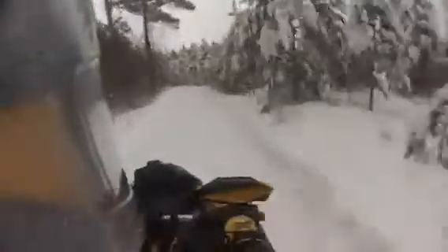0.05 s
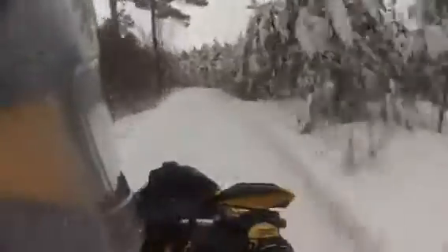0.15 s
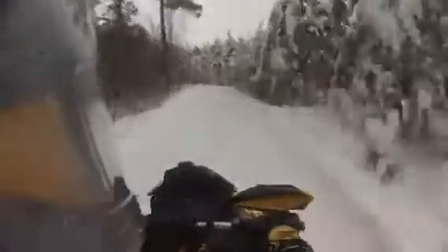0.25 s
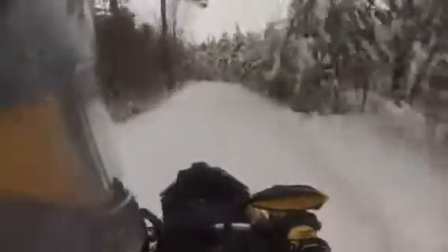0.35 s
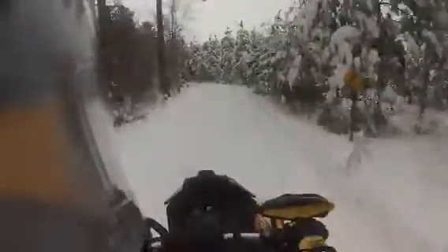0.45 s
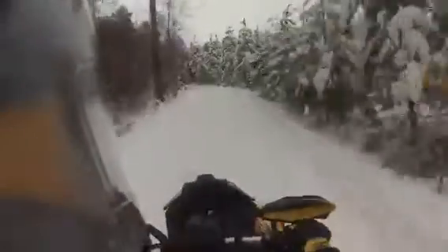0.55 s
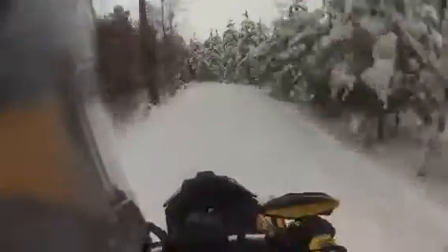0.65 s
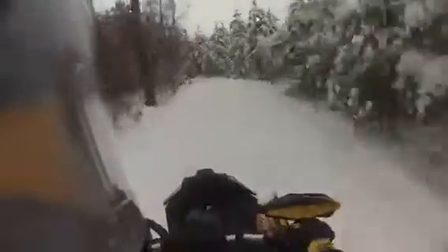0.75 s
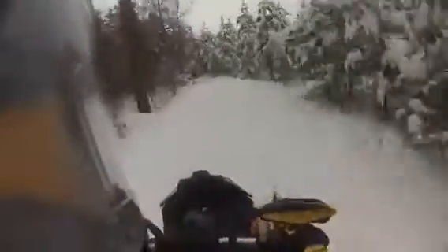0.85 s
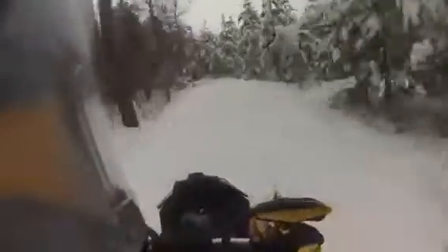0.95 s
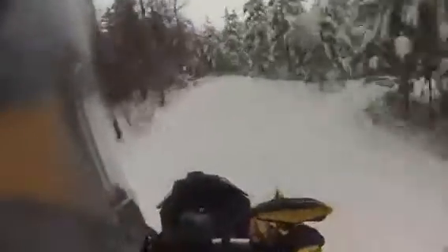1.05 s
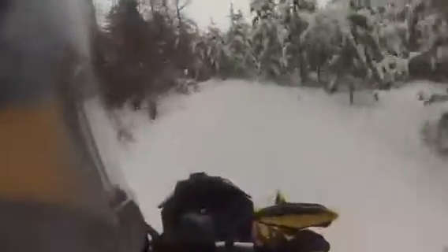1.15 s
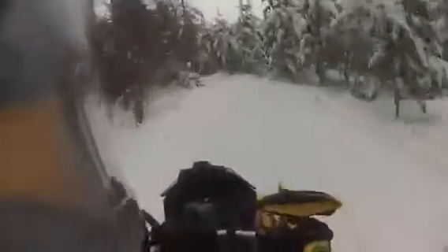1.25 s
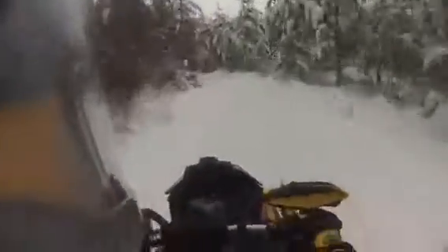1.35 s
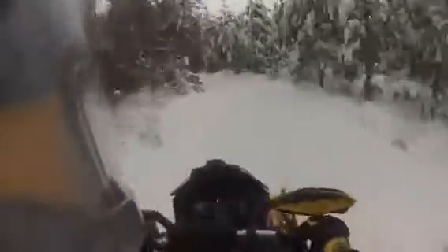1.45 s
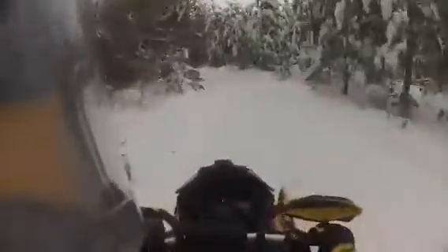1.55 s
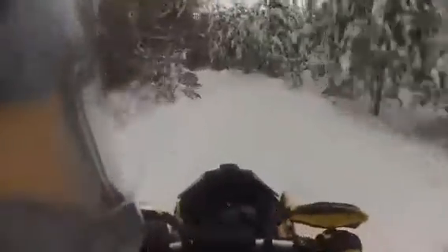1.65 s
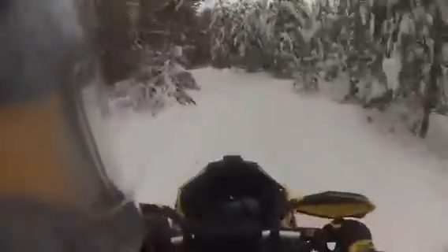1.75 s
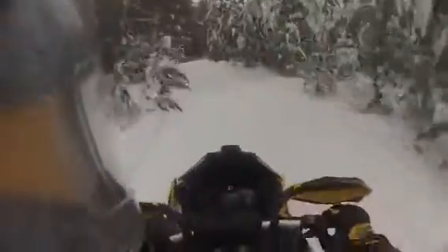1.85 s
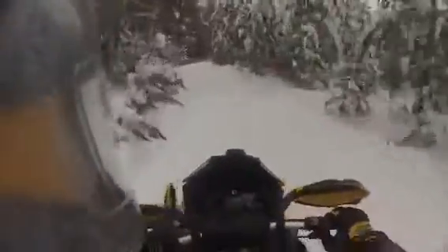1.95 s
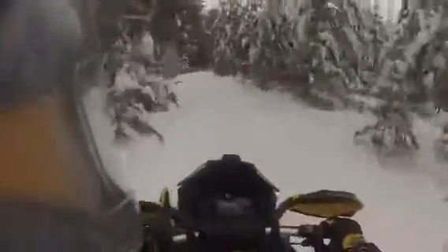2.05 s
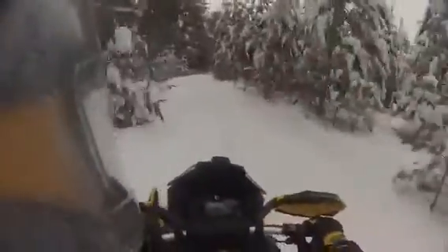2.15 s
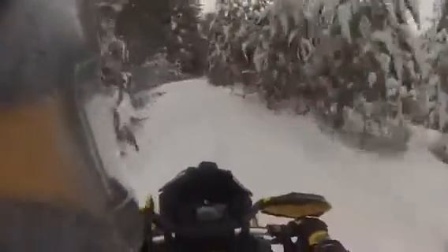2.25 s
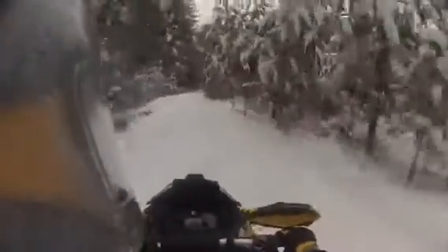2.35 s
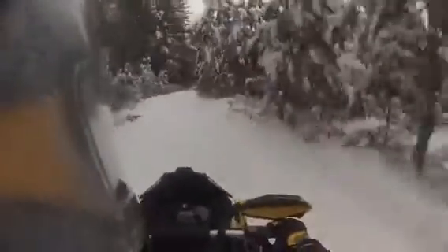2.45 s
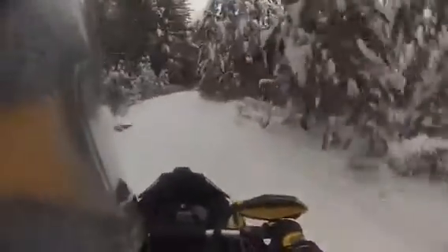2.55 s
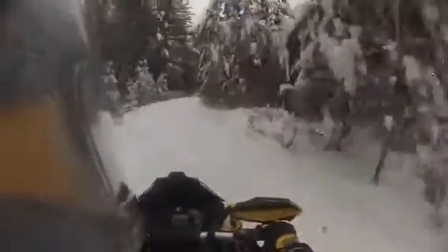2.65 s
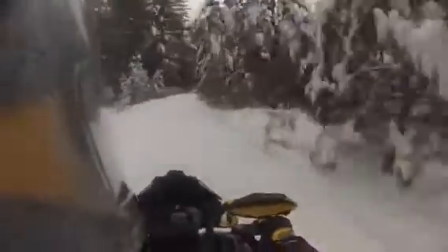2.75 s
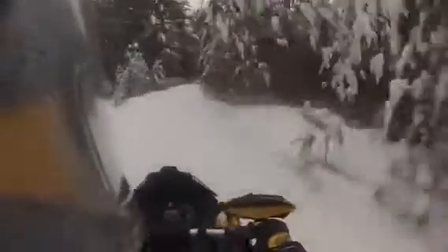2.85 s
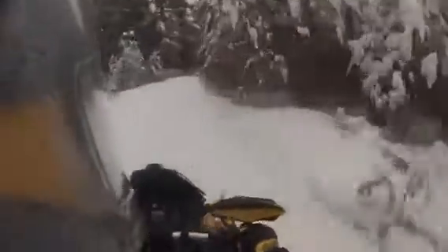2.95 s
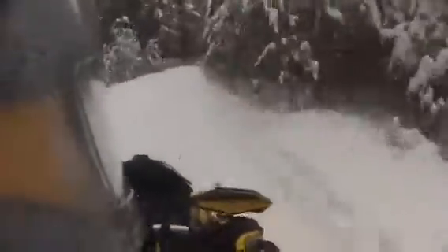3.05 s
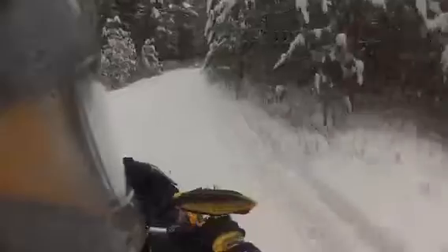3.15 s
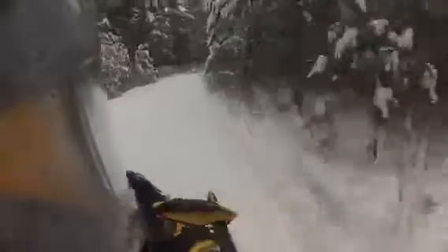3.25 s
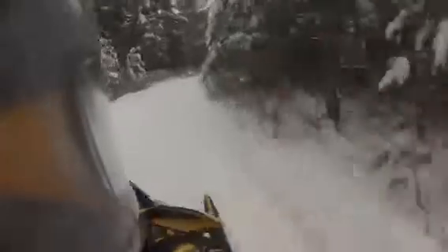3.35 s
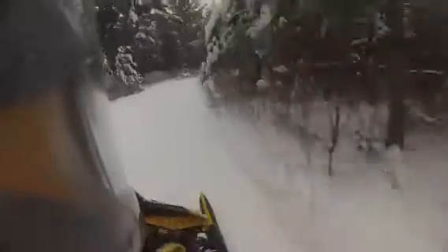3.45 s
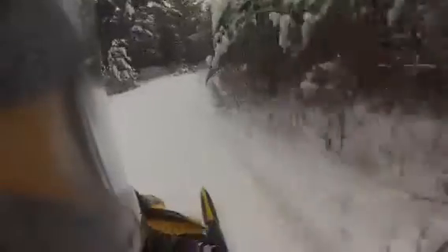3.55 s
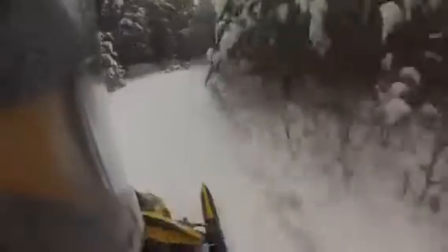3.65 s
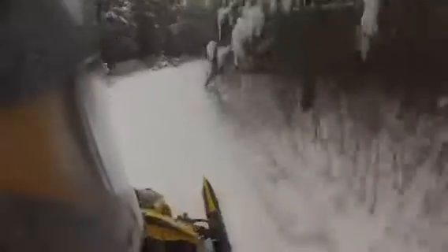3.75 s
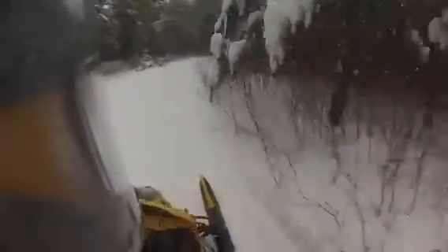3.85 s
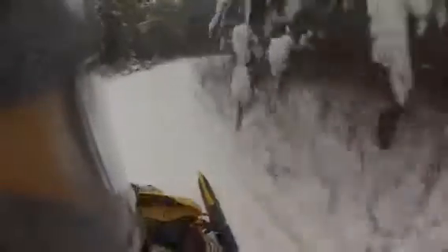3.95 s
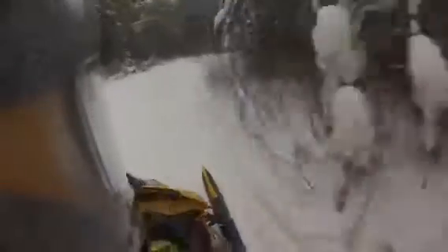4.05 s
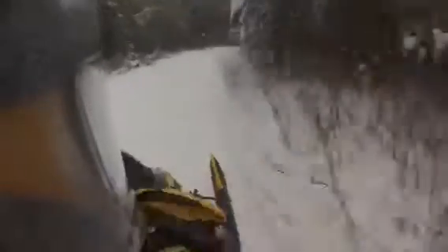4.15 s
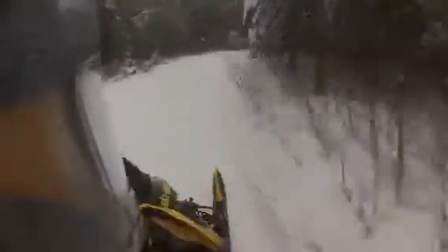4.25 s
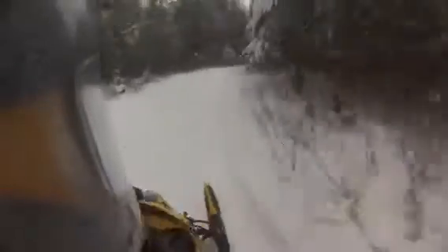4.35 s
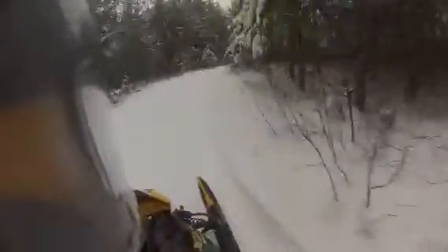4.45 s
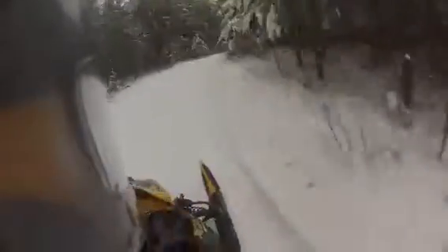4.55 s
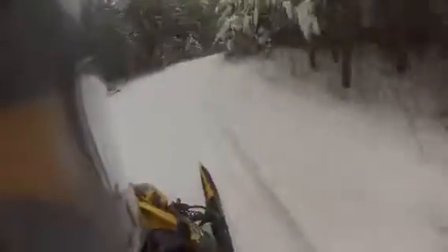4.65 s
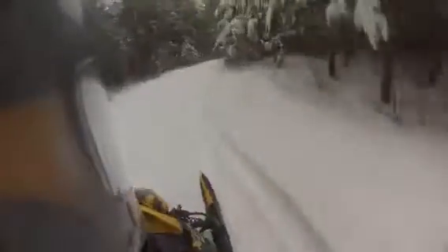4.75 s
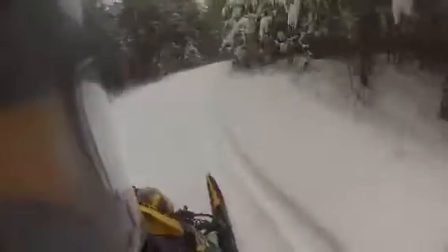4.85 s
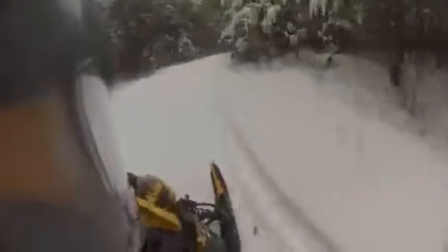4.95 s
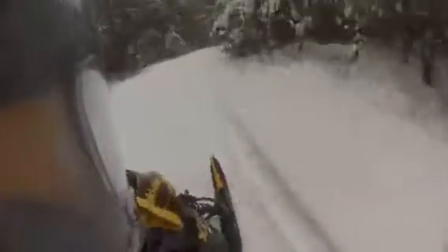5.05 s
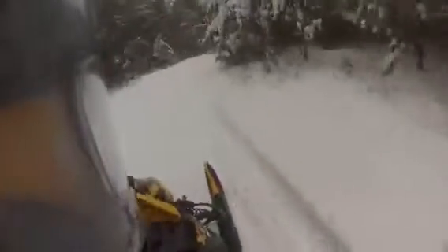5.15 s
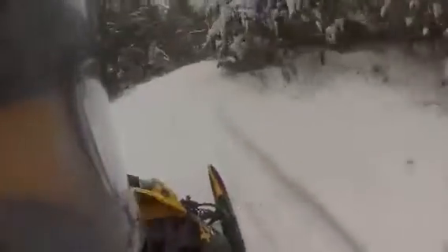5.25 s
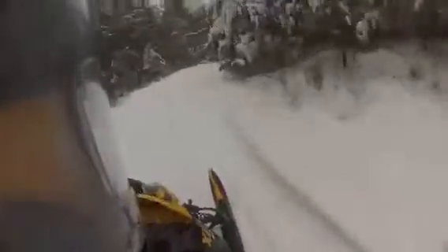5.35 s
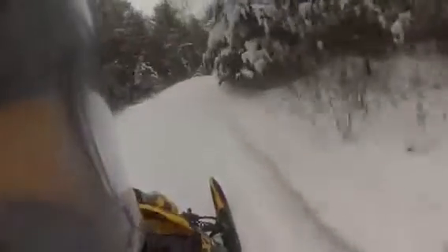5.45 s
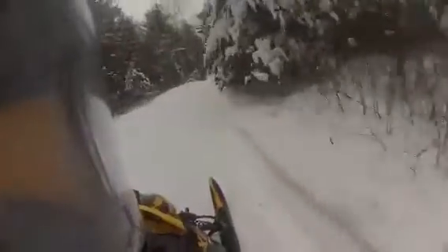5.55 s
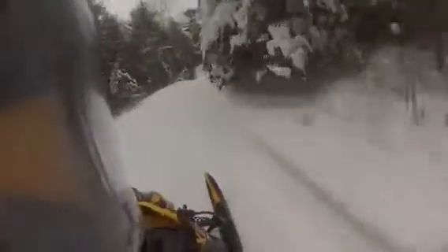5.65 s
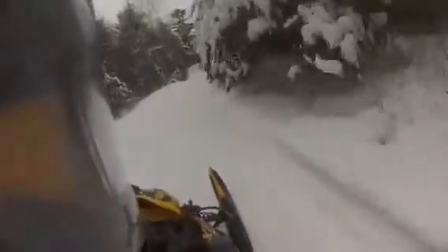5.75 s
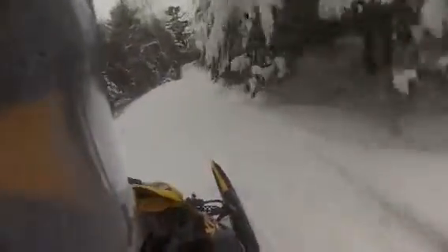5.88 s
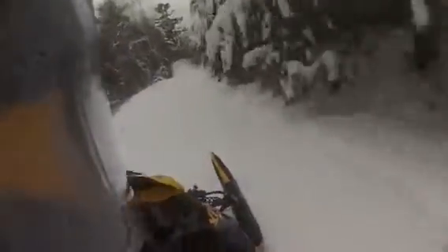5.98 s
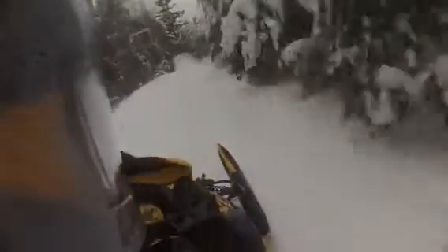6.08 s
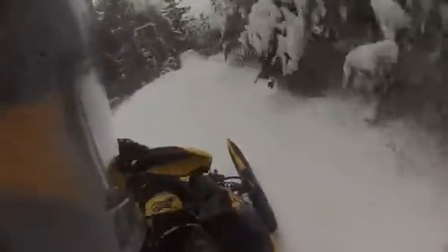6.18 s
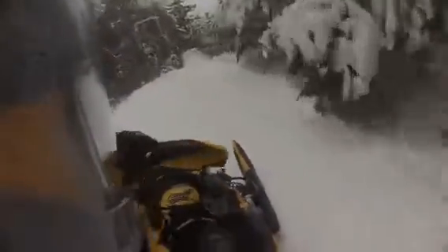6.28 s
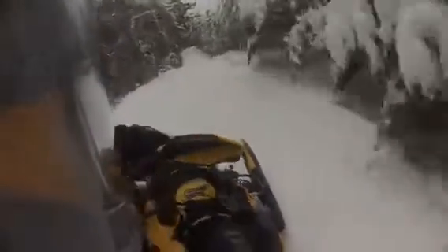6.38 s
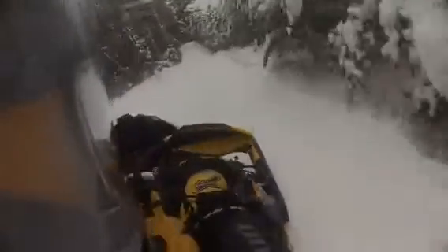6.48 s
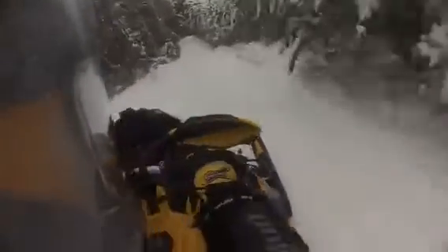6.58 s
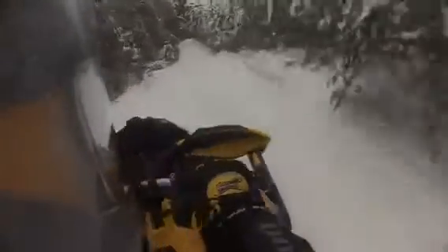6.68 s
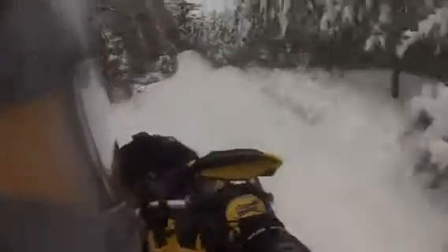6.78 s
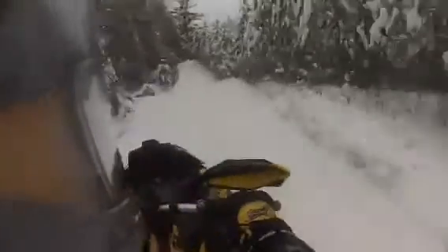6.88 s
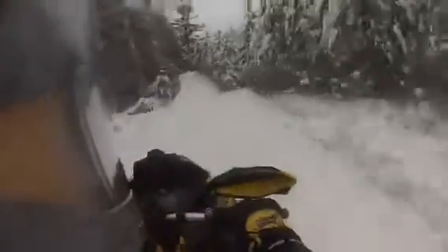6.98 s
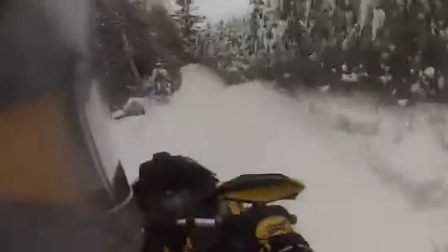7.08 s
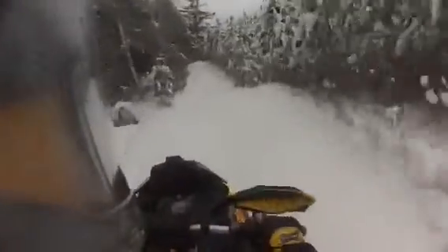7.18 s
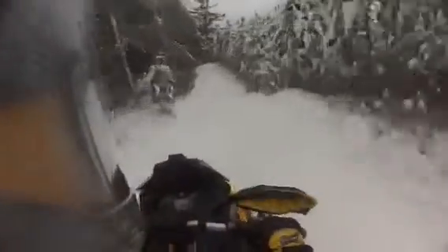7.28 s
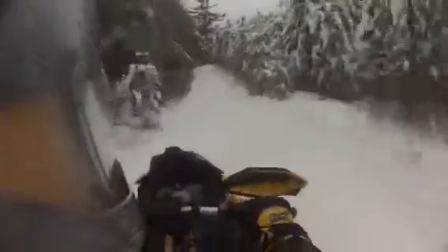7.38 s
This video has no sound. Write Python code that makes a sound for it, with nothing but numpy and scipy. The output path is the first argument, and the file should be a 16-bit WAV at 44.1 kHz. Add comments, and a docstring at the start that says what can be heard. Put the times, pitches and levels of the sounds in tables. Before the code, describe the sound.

Heavy wind buffets a microphone carried by a snowmobile rider on a forest trail. The buzzing engine winds down over the first half, then revs up twice and grows louder as the sled gathers speed. Mechanical clatter, a drumming track and hissing snow run throughout, with a few faint ticks of snow hitting the microphone and a thin wind whistle at the faster moments.

```python
"""A two-stroke twin snowmobile on a forest trail, heard from a camera case on the rider.
It coasts down, then opens up twice and gathers speed. Firings ring the pipe and the block, the drive
clatters under the hood and the track drums. Wind buffets the case and whistles over an edge,
snow hisses past the skis, and a few crumbs tick against the case."""
import sys
import numpy as np
from scipy import signal
from scipy.fft import rfft, irfft, next_fast_len
from scipy.io import wavfile
from scipy.ndimage import uniform_filter1d, minimum_filter1d

SR = 44100
rng = np.random.default_rng(int(sys.argv[2]) if len(sys.argv) > 2 else 0)


def transcribe(u):
    """Save the signal u as a 16-bit wav file named by the first command-line argument.

    u: samples, shape (n,) or (channels, n), limited to [-1, 1]; the rate is SR.
    q: integer samples, one column per channel.
    """
    v = np.clip(np.atleast_2d(u).T, -1, 1)
    q = np.round(v * 32767).astype(np.int16)
    wavfile.write(sys.argv[1], SR, q)


N = 327222
TOP_HZ = 15000

# strength of the firings as the throttle moves: time_s, level_db
FIRING_LEVEL = [(0, -39.5), (.4, -45.5), (1.5, -49), (2.3, -42), (3, -45), (3.8, -45.5), (4.45, -39),
                (5.07, -42), (5.15, -37), (5.5, -35.5), (5.91, -34), (6.03, -31.5), (6.72, -30.5),
                (6.95, -33.5), (7.42, -30)]
# the sled's speed over the snow: time_s, speed_m_s
SLED_SPEED = [(0, 12.87), (.7, 11.6), (1.6, 10.9), (2.4, 10.2), (3, 9.58), (3.65, 8.1), (4.15, 7.2),
              (4.4, 7.67), (5.05, 7.5), (5.5, 7.6), (6, 7.75), (6.7, 11.35), (7.15, 11.5), (7.42, 13.3)]


def engine(turns, bark_db=-3.5, bark_per_db=.3):
    """Pipe and block ring together; the exhaust gains on the block as the throttle opens."""
    load_db = curves(FIRING_LEVEL)[0]
    exhaust_db = bark_db + bark_per_db * (load_db - load_db.mean()) + throttle_snaps()
    voice = bodywork(exhaust(turns) * undb(exhaust_db) + block(turns))
    return unit(voice) * undb(load_db)


def firings(turns, second_db, lag_turns, jitter_s=.000025, scatter_db=1.7):
    """Two pressure pulses a turn; the second cylinder is weaker and may lag, and no two burns are alike."""
    stroke = np.arange(int(2 * turns[-1]))
    second = stroke % 2
    timing, burn = rng.standard_normal((len(stroke), 2)).T
    at = np.interp(stroke / 2 + lag_turns * second, turns, np.arange(N)) + SR * jitter_s * timing
    strength = undb(second_db * second + scatter_db * burn)
    taps = at.astype(int)[:, None] + np.arange(-7, 9)
    offset = taps - at[:, None]
    click = np.sinc(offset) * np.cos(np.pi * offset / 16) ** 2  # lands cleanly between samples
    return np.bincount(np.clip(taps, 0, N - 1).ravel(), (strength[:, None] * click).ravel(), N)


def exhaust(turns, growl_db=1.7):
    """Uneven puffs of gas ring the pipe."""
    # broad tone of the pipe: freq_hz, gain_db
    pipe_tone = [(150, -35), (270, -9), (360, 3), (420, -3), (480, -0.5), (600, -3.5), (700, -4),
                 (800, -5.5), (950, -22), (1120, -4.5), (1450, -17.5), (2000, -56), (8000, -63)]
    # pipe resonances: centre_hz, width_hz, lift_db
    pipe_modes = [(348.4, 25.4, 15.5), (490, 50, 12), (614, 46, 12), (816, 68, 5.5), (1155, 95, 15.5)]
    puffs = firings(turns, second_db=-7, lag_turns=.0022) * undb(growl_db * walk(35))
    return unit(resonate(colour(puffs, pipe_tone), pipe_modes))


def throttle_snaps(attack_s=.041, decay_s=.19):
    """Swing of the exhaust level in dB: the pipe barks as the throttle snaps open, or briefly ducks."""
    # barks and dips, scaled by their envelope: start_s, depth_db
    snaps = [(3.78, 12), (4.28, 3), (5.11, 4), (5.96, -2.5), (6.6, -2)]
    swing_db = 0
    for start_s, depth_db in snaps:
        age = np.maximum(np.arange(N) / SR - start_s, 0)
        swing_db += depth_db * (1 - np.exp(-age / attack_s)) * np.exp(-age / decay_s)
    return swing_db


def block(turns, rasp_db=1.5):
    """Firings knock the block; the nearer cylinder dominates, so every multiple of the crank rate sings."""
    # broad tone of the block: freq_hz, gain_db
    block_tone = [(300, -22.5), (600, -5.5), (900, -1.5), (1050, -4.5), (1170, 2.5), (1400, 1.5),
                  (1520, -2.5), (1700, 3), (2000, 1.5), (2300, -15), (3200, -20), (4800, -21.5),
                  (7200, -20.5), (14000, -83)]
    # block resonances: centre_hz, width_hz, lift_db
    block_modes = [(1184, 72, 9), (1340, 200, 5.5), (1735, 96, 7.5), (1966, 75, 4), (2680, 63, 8.5),
                   (4660, 460, 6)]
    knocks = firings(turns, second_db=-18, lag_turns=0) * undb(rasp_db * walk(70))
    return unit(sway(resonate(colour(knocks, block_tone), block_modes)))


def sway(x, share=.41, path_s=.0034, sway_s=.00014):
    """A second path off the swaying rider makes the overtones swell and fade in turn."""
    i = np.arange(N)
    delay_s = path_s + sway_s * walk(5)
    return x + share * np.interp(i - SR * delay_s, i, x)


def bodywork(x, feedback=-.5):
    """Reflections inside the bodywork smear each pulse into the next without changing its colour."""
    size = next_fast_len(N + SR // 4, True)
    spectrum = rfft(x, size)
    for delay_s in (.0013, .0022, .0037, .0053):
        delay = np.exp(-2j * np.pi * np.arange(len(spectrum)) * SR / size * delay_s)
        spectrum *= (delay - feedback) / (1 - feedback * delay)
    return irfft(spectrum, size)[:N]


def silencer(turns, flutter_db=2):
    """The silencer booms at the firing rate, twice a turn."""
    # weight of the boom: time_s, level_db
    boom_level = [(0, -36), (.7, -27), (3.7, -31.5), (3.9, -25), (4.5, -35), (5.2, -37), (5.9, -31),
                  (6.15, -26.5), (6.5, -24.5), (7.42, -24)]
    boom = np.sin(2 * np.pi * 2 * turns) * undb(flutter_db * walk(32))
    return unit(boom) * undb(curves(boom_level)[0])


def drive(turns, throb=.059, shake_db=.92, strain=.24):
    """Clutch, chain and pistons clatter in step with the crank, louder with speed and a little with load."""
    # tone of the clatter: freq_hz, gain_db
    clatter_tone = [(250, -7.5), (500, -2.5), (750, -9), (1000, 0.5), (1300, -3.5), (1550, -0.5), (1800, 4),
                    (2030, 0), (2280, -10), (2700, -10.5), (3100, -20), (12000, -55.5)]
    # hood and tunnel resonances: centre_hz, width_hz, lift_db
    hood_modes = [(357, 51, 0), (652.4, 11.1, 14), (1236, 13, 4), (1364, 91, 8.5), (1600, 78, 1)]
    pulsing = (1 + throb * np.cos(2 * np.pi * turns)) * undb(shake_db * walk(45))
    clatter = unit(resonate(colour(noise() * pulsing, clatter_tone), hood_modes))
    load_db = curves(FIRING_LEVEL)[0]
    strain_db = strain * (load_db - load_db.mean())
    return clatter * undb(by_speed(cruise_db=-33.5, doubling_db=13.8) + strain_db)


def track(slip=.0133, second_db=-12, third_db=-14):
    """Track lugs drum unevenly as they meet wheel and snow."""
    # lugs passing the drive wheel: time_s, rate_hz, level_db
    lugs = [(0, 160.5, -31.5), (1.3, 141.8, -30.5), (2.3, 121.1, -34), (3.2, 94.84, -31.5),
            (4.1, 81.5, -34), (4.9, 88, -33), (5.2, 119.1, -30), (5.6, 128.6, -32.5), (6, 138.7, -31.5),
            (6.5, 160.4, -42), (7.42, 157.6, -28)]
    rate_hz, level_db = curves(lugs)
    phase = 2 * np.pi * np.cumsum(rate_hz * (1 + slip * walk(12))) / SR
    drum = np.sin(phase) + undb(second_db) * np.sin(2 * phase) + undb(third_db) * np.sin(3 * phase)
    slap = 1 + .6 * walk(22)
    return unit(drum * slap) * undb(level_db)


def wind(swirl_db=1.1, flurry_db=1.2):
    """Big eddies buffet the case and small ones rush round it in quick flurries."""
    # rumble of the big eddies: freq_hz, gain_db
    buffet_tone = [(10, -22.5), (24, 5), (45, -4), (70, -1), (100, -5.5), (150, -10), (200, -15),
                   (300, -24.5), (600, -71)]
    # rush of the small eddies: freq_hz, gain_db
    rush_tone = [(70, -6), (150, 3.5), (230, 1.5), (300, -2), (380, -1.5), (470, -17), (600, -20),
                 (900, -30), (2000, -64)]
    buffet = unit(colour(noise(), buffet_tone))
    buffet *= undb(by_speed(cruise_db=-16.5, doubling_db=13.2) + swirl_db * walk(8))
    rush = unit(colour(noise() * undb(flurry_db * walk(40)), rush_tone))
    return buffet + rush * undb(by_speed(cruise_db=-25.5, doubling_db=19))


def low_swells(width_share=.79):
    """Low swells on the case: wind gusts, and one short thud as the sled hits a bump."""
    # swells of low noise, the second being the thud: peak_s, length_s, level_db, centre_hz
    swells = [(1.203, 0.35, -19.5, 99), (2.217, 0.065, -26.5, 217), (2.89, 0.2, -21, 51.3),
              (3.256, 0.5, -21, 58.6), (4.25, 0.46, -31.5, 102), (4.603, .22, -24.5, 81),
              (4.885, 0.23, -23, 75), (5.096, 0.061, -21, 84.6)]
    source = noise()
    return sum(unit(band(source, hz, width_share * hz)) * undb(level_db) * bump(peak_s, length_s)
               for peak_s, length_s, level_db, hz in swells)


def thumps(push_to_pull_s=.006):
    """The biggest eddies each give the case one push and one pull."""
    # slams on the case: centre_s, strength_db
    slams = [(.372, 3), (.538, 1), (1.298, -3), (6.85, 0), (7.21, -1)]
    out = np.zeros(N)
    for centre_s, strength_db in slams:
        u = 2 * (np.arange(N) / SR - centre_s) / push_to_pull_s
        out -= undb(strength_db) * u * np.exp((1 - u ** 2) / 2)
    return out


def snow(flicker_db=.68):
    """Skis hiss through the snow; hiss and spray flicker together."""
    # tone of the skis: freq_hz, gain_db
    hiss_tone = [(1500, 8), (2500, 8.5), (3050, 5), (3500, 10), (4100, 0), (4700, 4.5), (5200, -0.5),
                 (6200, 1.5), (7200, 1), (8100, -10.5), (10000, -25), (15000, -19)]
    flicker = undb(flicker_db * walk(50))
    hiss = unit(colour(noise(), hiss_tone)) * undb(by_speed(cruise_db=-41, doubling_db=23.5))
    return flicker * (hiss + spray())


def spray(powder_m_s=9.3, blend_m_s=.4):
    """The sled throws grains of snow, coarse ones when slow and fine powder when fast."""
    # tone of fine powder: freq_hz, gain_db
    powder_tone = [(6000, -21), (8500, -6), (10100, -7), (11000, -2), (12500, -1.5), (14000, -6.5),
                   (15200, -8)]
    # tone of coarse snow: freq_hz, gain_db
    coarse_tone = [(6000, -16.5), (8500, -1), (10100, -4), (11000, 6), (12800, 0), (14000, -16.5),
                   (15200, -29)]
    # swells of spray, the long last one thrown by the track under throttle: peak_s, length_s, lift_db
    swells = [(2.723, 0.27, 1.5), (4.36, 0.2, 6), (5.4, 1, 4)]
    powder = unit(colour(grains(), powder_tone))
    coarse = unit(colour(grains(), coarse_tone))
    fine_share = (1 + np.tanh((curves(SLED_SPEED)[0] - powder_m_s) / blend_m_s)) / 2
    thrown = np.sqrt(fine_share) * powder + np.sqrt(1 - fine_share) * coarse
    swell_db = sum(lift_db * bump(peak_s, length_s) for peak_s, length_s, lift_db in swells)
    return thrown * undb(by_speed(cruise_db=-53.5, doubling_db=27.5) + swell_db)


def grains(spread_db=3):
    """Dense specks of uneven size, none large enough to stand alone."""
    return noise() * undb(spread_db * np.minimum(rng.exponential(size=N), 6))


def whistle(pitch_hz=5560, width_hz=650):
    """Air over an edge of the case makes a breathy tone that fades through the slow stretch."""
    # edge tone: time_s, level_db
    whistle_level = [(0, -46), (1.3, -51.5), (1.9, -51.5), (2.6, -58), (3.4, -58), (3.7, -68.5), (6.1, -73),
                     (6.7, -50), (7.42, -43)]
    return unit(band(noise(), pitch_hz, width_hz)) * undb(curves(whistle_level)[0])


def crumbs(decay_s=.0014, width_hz=5000):
    """Each crumb of snow hits the case with one short, bright tick."""
    # crumb hits: start_s, peak_db, pitch_hz
    hits = [(3.272, -51, 9000), (3.410, -41.5, 9500), (3.759, -46, 11500), (4.693, -48.5, 8500),
            (5.311, -41, 8500), (5.605, -39, 12000), (5.766, -46, 8000), (6.156, -45.5, 7500)]
    out, t = np.zeros(N), np.arange(SR // 40) / SR
    for start_s, peak_db, pitch_hz in hits:
        burst = rng.standard_normal(len(t)) * np.exp(-t / decay_s)
        tick = band(burst, pitch_hz, width_hz)
        start = int(start_s * SR)
        out[start:start + len(t)] += undb(peak_db) * tick / np.abs(tick).max()
    return out


def by_speed(cruise_db, doubling_db, cruise_m_s=12):
    """Level in dB of a sound that gains a set step for each doubling of the sled's speed."""
    return cruise_db + doubling_db * np.log2(curves(SLED_SPEED)[0] / cruise_m_s)


def resonate(x, modes):
    """A resonant body lifts a few narrow bands of whatever excites it."""
    return x + sum((undb(lift_db) - 1) * ring(x, hz, width_hz) for hz, width_hz, lift_db in modes)


def ring(x, hz, width_hz):
    """One resonance, gain one at its centre."""
    return signal.lfilter(*signal.iirpeak(min(hz, TOP_HZ), hz / width_hz, fs=SR), x)


def band(x, hz, width_hz):
    """The same resonance twice, for steeper skirts."""
    return ring(ring(x, hz, width_hz), hz, width_hz)


def colour(x, tone):
    """Minimum-phase EQ through (freq_hz, gain_db) points."""
    size = next_fast_len(N + SR // 4, True)
    hz, db = np.transpose(tone)
    bin_hz = np.arange(size // 2 + 1) * SR / size
    gain = undb(np.interp(np.log(bin_hz + 1), np.log(hz), db))
    cepstrum = irfft(np.log(gain), size)
    cepstrum[1:size // 2] *= 2
    cepstrum[size // 2:] = 0
    return irfft(rfft(x, size) * np.exp(rfft(cepstrum)), size)[:N]


def walk(rate_hz):
    """Smooth random wandering with an rms of one."""
    hold = max(int(SR / rate_hz), 2)
    steps = np.repeat(rng.standard_normal(N // hold + 1), hold)
    return unit(uniform_filter1d(uniform_filter1d(steps, hold), hold)[:N])


def bump(peak_s, length_s):
    """A smooth rise and fall, one at its height."""
    return np.exp(-(2 * (np.arange(N) / SR - peak_s) / length_s) ** 2)


def curves(table):
    """The columns of a table of (time_s, ...) rows, one value a sample."""
    time_s, *columns = np.transpose(table)
    return [np.interp(np.arange(N) / SR, time_s, column) for column in columns]


def noise():
    """White noise."""
    return rng.standard_normal(N)


def unit(x):
    """Scale to an rms of one."""
    return x / np.sqrt(np.mean(x ** 2))


def undb(db):
    """Decibels to gain."""
    return 10 ** (np.asarray(db) / 20)


def limit(x, ceiling_db=-4.5, window_s=.0058, release_s=.03):
    """Turn down at once for a peak over the ceiling, then recover."""
    window = int(window_s * SR)
    recovery = np.arange(N) / SR / release_s
    over_db = np.maximum(20 * np.log10(np.abs(x) + 1e-9) - ceiling_db, 1e-9)
    cut_db = np.exp(np.maximum.accumulate(np.log(over_db) + recovery, axis=-1) - recovery)
    return x * uniform_filter1d(minimum_filter1d(undb(-cut_db), window), window)


def scene(hunt=.002045, trail_bumps_db=.42):
    """Every source travels with the rider; bumps in the trail shake drive and skis together."""
    # engine speed: time_s, turns_per_s
    crank_speed = [(0, 107), (.35, 108.3), (1, 89.2), (1.5, 83.3), (2.2, 82.4), (2.65, 79.5), (3, 73.4),
                   (3.25, 66), (3.75, 62.8), (4.2, 69.4), (4.42, 76.6), (5.09, 74.1), (5.42, 89),
                   (5.6, 91.4), (5.92, 93.2), (6.15, 98.4), (6.33, 100.8), (6.58, 98.4), (6.78, 104.8),
                   (7.42, 106.2)]
    turns = np.cumsum(curves(crank_speed)[0] * (1 + hunt * walk(20))) / SR
    running_gear = (drive(turns) + snow()) * undb(trail_bumps_db * walk(11))
    sled = engine(turns) + silencer(turns) + running_gear + track()
    return (sled + wind() + low_swells() + thumps() + whistle() + crumbs())[None]


def record(dry):
    """A limiter ducks everything after the biggest wind thumps, and the top is cut."""
    high_cut = signal.ellip(10, .2, 80, TOP_HZ, fs=SR, output="sos")
    return signal.sosfilt(high_cut, limit(dry))


dry = scene()
out = record(dry)
transcribe(out)
```